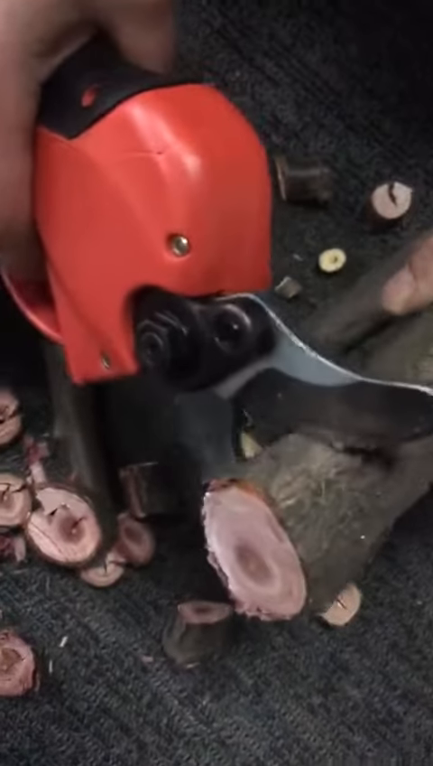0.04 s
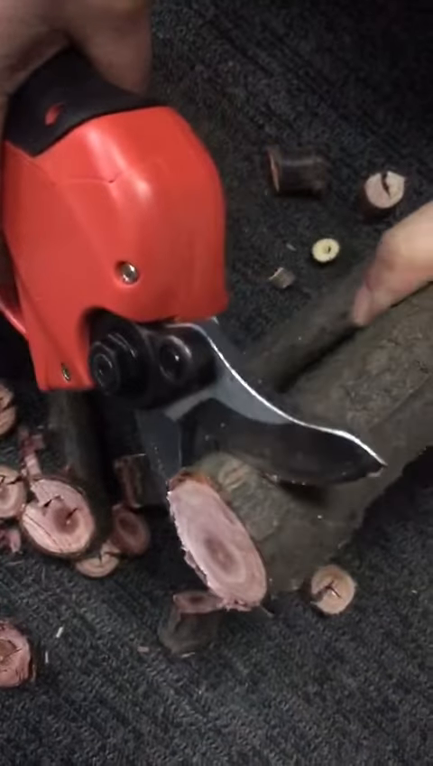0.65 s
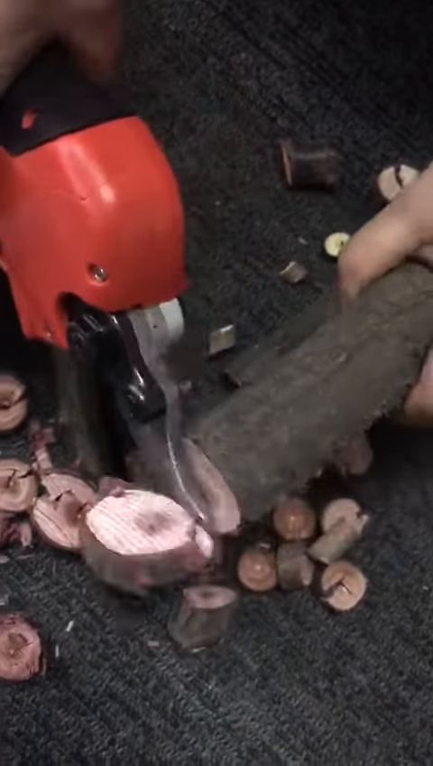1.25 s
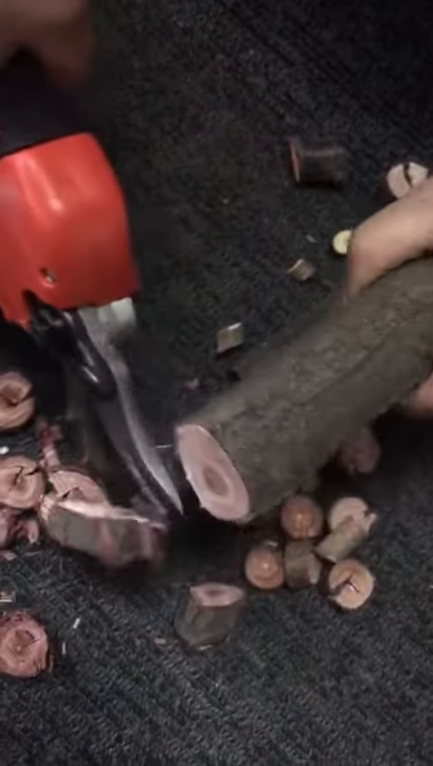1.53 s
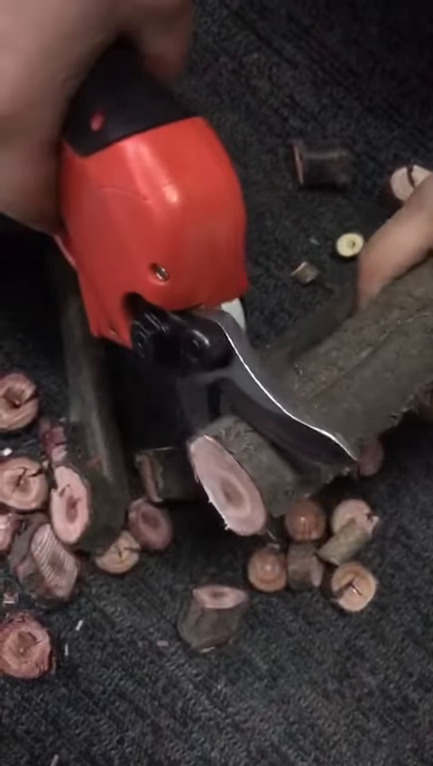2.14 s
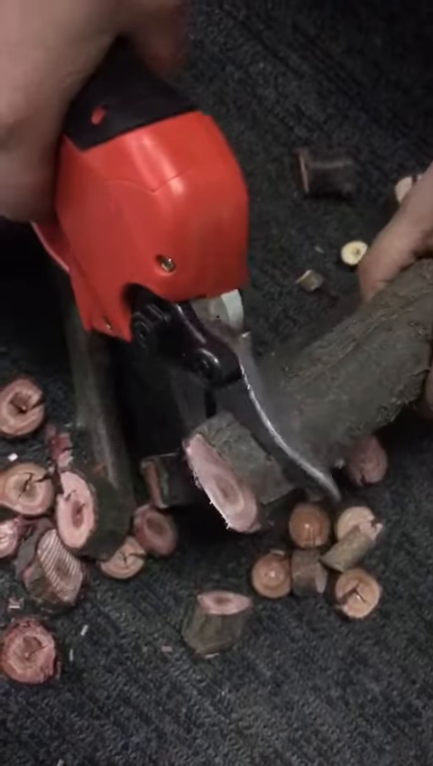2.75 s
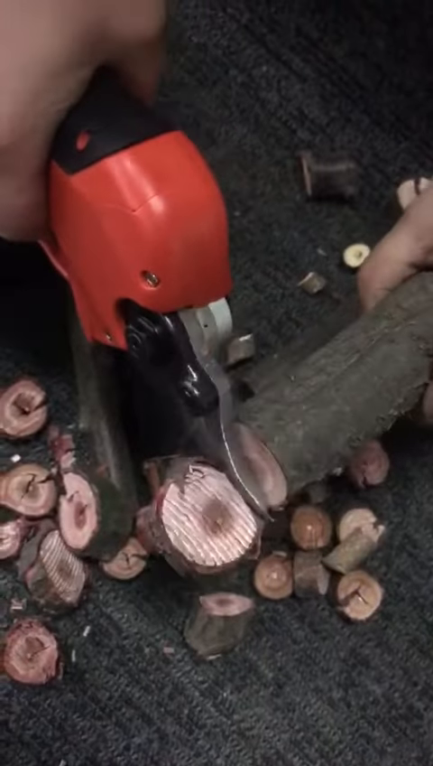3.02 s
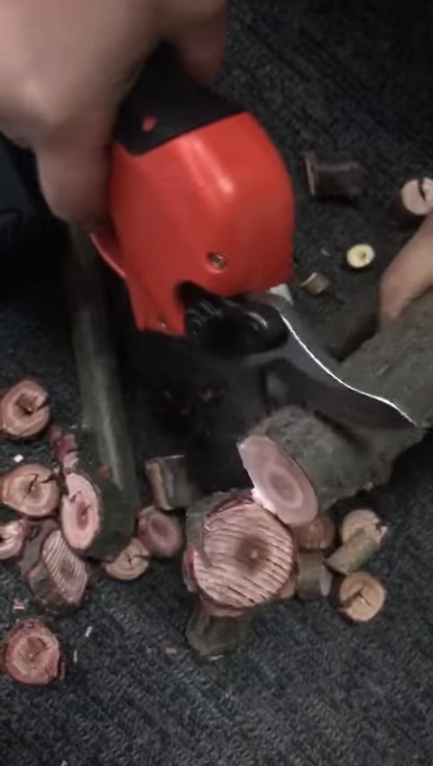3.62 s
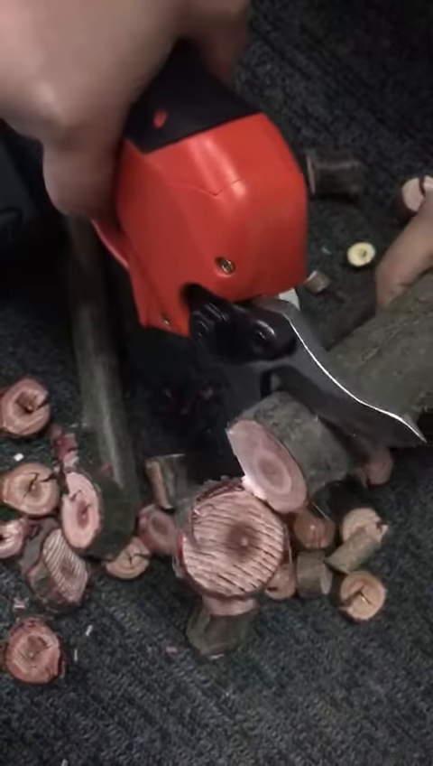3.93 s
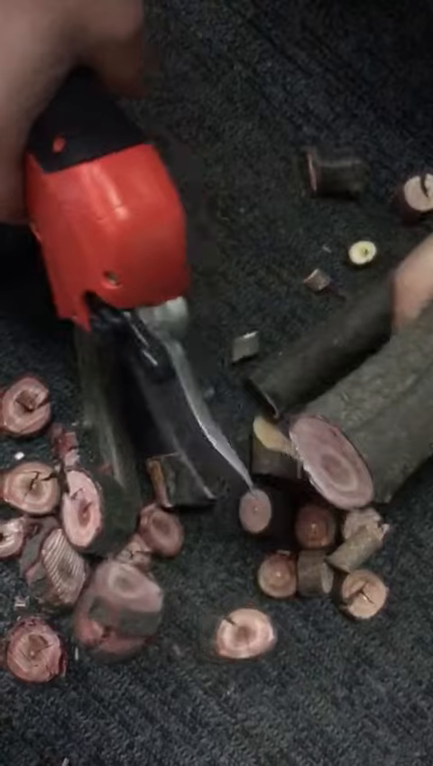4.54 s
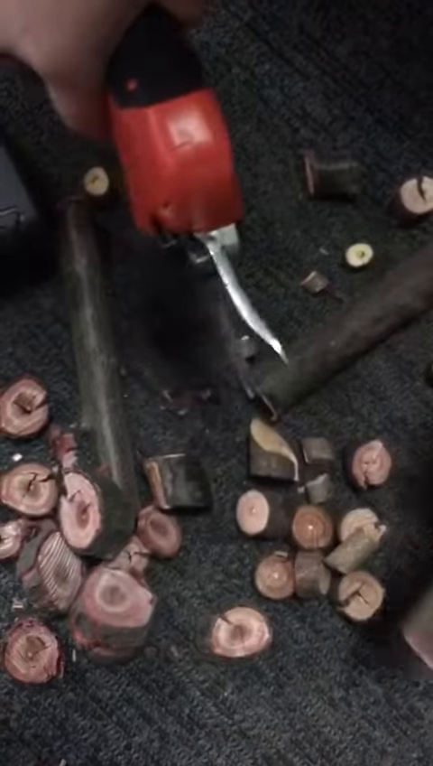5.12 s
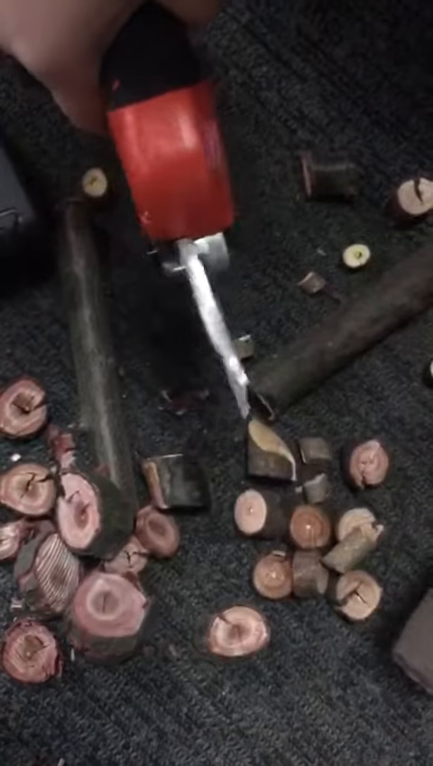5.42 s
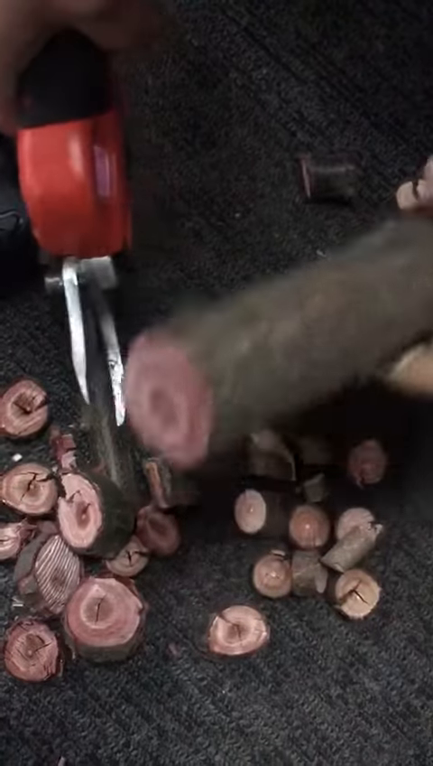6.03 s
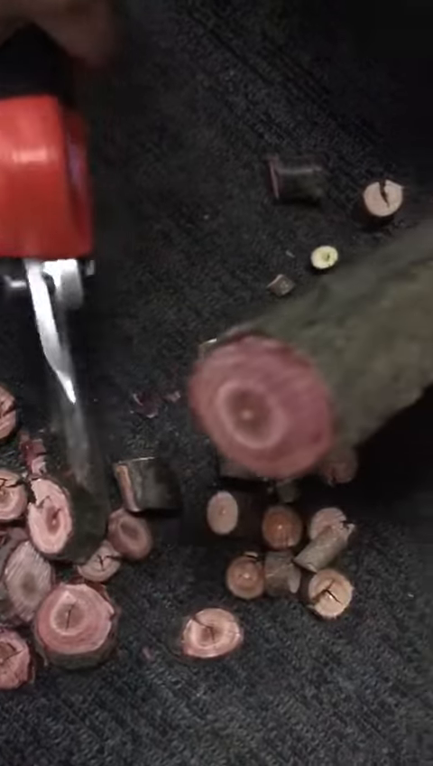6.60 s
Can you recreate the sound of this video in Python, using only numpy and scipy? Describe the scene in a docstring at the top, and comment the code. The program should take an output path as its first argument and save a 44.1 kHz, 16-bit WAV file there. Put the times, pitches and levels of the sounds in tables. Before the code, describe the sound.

Three close cuts of electric pruning shears: each a clack, a sagging motor growl and cracking wood, then a short whine as the blade reopens.

```python
"""A battery pruner slices three discs off a thick branch, close by, in a quiet room.
At each cut the gears clack, whir up and sag in pitch under load, while the wood fractures in a run of
cracks that excite the modes of the branch and jolt the tool. The motor then reverses and whines the
blade open. Handling adds ticks, rustling, a scrape of bark and a dull knock."""
import sys
import numpy as np
from scipy import signal
from scipy.fft import rfft, irfft
from scipy.io import wavfile
from scipy.ndimage import uniform_filter1d

SR = 44100
rng = np.random.default_rng(int(sys.argv[2]) if len(sys.argv) > 2 else 0)


def output_pcm(signal):
    """Save a mono or channel-first signal as 16-bit PCM at the path in sys.argv[1].

    Samples are clipped to [-1, 1] before scaling.
    """
    pcm = np.clip(np.atleast_2d(signal).T, -1, 1) * 32767
    wavfile.write(sys.argv[1], SR, np.round(pcm).astype(np.int16))


N = 298116

# Closing strokes. Each row: start in seconds, clack level in dB, blade contact and motor stop in
# seconds, loaded shaft speed in Hz, strongest jolt in dB, factor on the pitch of the cracks.
CUTS = [(.957, -38.5, 1.052, 1.232, 208, -47.5, 1.0), (2.5849, -39.5, 2.661, 2.865, 214, -49.5, 1.04),
        (3.904, -39, 3.984, 4.183, 202, -41, 1.02)]
# Opening strokes. Each row: start in seconds, clack level in dB, whine gain in dB.
OPENINGS = [(1.4286, -41, 2), (3.075, -37.5, 1.5), (4.402, -41, 1.5)]
# Fractures of the wood. Each row: time in seconds, relative level in dB.
CRACKS = [(1.098, 0.5), (1.113, 1), (1.1302, 2.5), (1.144, 1), (1.1525, -3), (1.165, -3.5), (1.1774, -2),
          (1.184, -4.5), (1.208, -4.5), (1.218, -2), (2.7035, -10.5), (2.7173, -1), (2.7403, -1),
          (2.754, 1.5), (2.773, 0), (2.805, -1), (2.8162, -6), (2.824, -2), (2.832, -0.5), (2.847, .5),
          (2.859, -2), (4.035, -7), (4.054, -1), (4.0789, -3.5), (4.0942, -5.5), (4.105, 3.5), (4.129, 0),
          (4.148, -2), (4.1634, 0.5), (4.181, 0.5), (4.192, -5)]
# Modes of the branch in the jaws. Each row: frequency in Hz, bandwidth in Hz, gain in dB.
BRANCH_MODES = [(530.7, 39, -8), (1035, 47, 0.5), (1420, 130, 1.5), (1716, 140, 4.5), (2100, 600, 1.5),
                (2250, 300, -0.5), (2980, 95, 2), (3420, 290, -11), (4320, 79, -19), (6050, 810, -17)]


def gain_of(db):
    """Decibels to amplitude."""
    return 10 ** (np.asarray(db) / 20)


def evened(x):
    """Scales to rms 1."""
    return x / np.sqrt(np.mean(x ** 2) + 1e-20)


def peaked(x, db):
    """Scales to a peak level."""
    return gain_of(db) * x / abs(x).max()


def read(points, hz):
    """Interpolation on a logarithmic frequency axis."""
    f, value = np.transpose(points)
    return np.interp(np.log(hz + 1), np.log(f + 1), value)


def add(mix, s, sound):
    """Superposition: a sound joins the mix at s seconds."""
    part = mix[max(round(s * SR), 0):][:len(sound)]
    part += sound[:len(part)]


def colour(x, points, size=4096):
    """Minimum-phase filtering by a spectrum whose rows give frequency in Hz and gain in dB."""
    log_gain = np.log(gain_of(read(points, abs(np.fft.fftfreq(size, 1 / SR)))))
    taps = np.fft.ifft(np.exp(np.conj(signal.hilbert(log_gain)))).real
    return signal.oaconvolve(x, taps)[:len(x)]


def resonate(x, hz, width):
    """A damped resonator of unit gain whose frequency may glide."""
    turn = np.exp(2j * np.pi * np.cumsum(hz * np.ones(len(x))) / SR)
    pole = np.exp(-np.pi * width / SR)
    return 2 * (turn * signal.lfilter([1 - pole], [1, -pole], x / turn + 1e-18)).real


def ring(force, modes):
    """Modal superposition: a body responds with the sum of its resonances."""
    return sum(gain_of(db) * resonate(force, hz, width) for hz, width, db in modes)


def strike(force, modes, pitch=1):
    """Modal response to an impact, with each mode's share of the energy prescribed."""
    partials = (gain_of(db) * evened(resonate(force, hz * pitch, width)) for hz, width, db in modes)
    return evened(sum(partials))


def narrow_noise(hz, width):
    """Noise through two resonators in series: a rough tone that follows hz."""
    noise = rng.standard_normal(len(hz))
    return evened(resonate(resonate(noise, hz, width), hz, width))


def wander(count, rate_hz):
    """Random fluctuation: low-pass noise of unit rms."""
    hz = np.fft.rfftfreq(count, 1 / SR)
    return evened(irfft(rfft(rng.standard_normal(count)) / (1 + (hz / rate_hz) ** 4), count))


def burst(decay_s, steep, size=4096):
    """Many tiny impacts merge into noise that starts at once and decays."""
    t = np.arange(size) / SR
    return rng.standard_normal(size) * np.exp(-(t / decay_s) ** steep)


def air(start_db=-56.5, end_db=-60, settle_s=.97):
    """Ambient noise: a low room tone that settles a little."""
    # Each row: frequency in Hz, relative density in dB.
    spectrum = [(12, -49), (20, -10), (105, -3.5), (147, -12.5), (346, -17), (510, -28), (554, -19),
                (655, -25), (840, -23), (2340, -35), (2760, -56), (3170, -44), (4800, -52.5), (13400, -56),
                (15000, -56.5)]
    early = np.exp(-(np.arange(N) / SR / settle_s) ** 2)
    level_db = end_db + (start_db - end_db) * early
    return gain_of(level_db) * evened(colour(rng.standard_normal(N), spectrum))


def rustle(resting_db=-72):
    """Friction of hands on tool and bark: the moves are incoherent, so their powers add."""
    # Each row: midpoint in seconds, half length in seconds, level in dB.
    rubs = [(0.818, 0.086, -67), (1.948, 0.048, -62), (2.2, 0.086, -67.5), (5.15, 0.21, -62),
            (5.826, 0.24, -61.5), (6.72, 0.15, -66.5)]
    # Each row: frequency in Hz, relative density in dB.
    spectrum = [(200, -2), (600, 0.5), (1000, 11.5), (2000, 0.5), (3200, -3.5), (5000, -7.5), (9000, -11.5),
                (14000, -16)]
    t = np.arange(N) / SR
    grain = gain_of(2.2 * wander(N, 90)) * rng.standard_normal(N)
    rub_power = sum(gain_of(db) ** 2 * np.exp(-((t - s) / length) ** 2) for s, length, db in rubs)
    return np.sqrt(gain_of(resting_db) ** 2 + rub_power) * evened(colour(grain, spectrum))


def clacks():
    """Backlash: at each start the gears take up their slack in two impacts that ring the gearbox."""
    # Each row: frequency in Hz, bandwidth in Hz, relative level in dB.
    gearbox_modes = [(1400, 50, -3.5), (1920, 19, -5.5), (2390, 150, -5.5), (3890, 290, -17.5),
                     (5850, 200, -13.5), (6300, 710, -13.5), (7850, 150, -8)]
    passband = [(300, -14.5), (900, -10), (1350, .5), (2600, 0), (8500, 0), (11000, -11.5)]
    out = np.zeros(N)
    for s, db, *_ in CUTS + OPENINGS:
        force = .7 * burst(.003, 3)
        add(force, .003, burst(.0013, 2))
        clack = colour(strike(force, gearbox_modes), passband)
        add(out, s, gain_of(db) * evened(clack))
    return out


def throttle(t, brake_at_s, brake_s, run_up_s=.082):
    """Share of full shaft speed: raised-cosine ramps for acceleration and braking."""
    rise, fall = np.sin(np.pi / 2 * np.clip([t / run_up_s, (t - brake_at_s) / brake_s], 0, 1)) ** 2
    return rise * (1 - fall)


def effort(speed, idle_db, knee_hz, steep):
    """Drive noise grows with shaft speed: a gain in dB that nears zero past the knee."""
    return idle_db * np.exp(-(speed / knee_hz) ** steep)


def squeal(speed, db, sag):
    """Switching noise: the chopped current squeals at low speed, lower as the shaft turns faster."""
    tone = narrow_noise(10150 - sag * speed, width=300)
    return gain_of(db) * tone * np.exp(-(speed / 210) ** 4) * (1 - np.exp(-speed / 60))


def tones(speed, orders, jitter, flutter):
    """Tones at multiples of the shaft speed; uneven teeth modulate their frequency and amplitude."""
    # Radiation from the housing. Each row: frequency in Hz, gain in dB.
    housing = [(250, -13), (600, -9), (1100, -15), (1520, 6), (1900, -1), (2500, 0), (3400, -7), (4400, 5),
               (6000, 1), (14000, 0)]
    count = len(speed)
    turns = np.cumsum(speed * (1 + jitter * wander(count, 110))) / SR
    lines = np.zeros(count)
    for order, db in orders:
        amplitude = gain_of(db) * (1 + flutter * wander(count, 230))
        lines += amplitude * np.sin(2 * np.pi * (order * turns + rng.random()))
    return colour(np.sqrt(2) * lines, housing)


def rattle(speed, spectrum, depth_db):
    """Amplitude-modulated noise: gear teeth chatter in clumps that come round with the shaft."""
    turns = np.cumsum(speed) / SR
    clumps = gain_of(depth_db * (np.cos(2 * np.pi * turns) + wander(len(speed), 260)))
    return shell(colour(clumps * rng.standard_normal(len(speed)), spectrum))


def shell(x):
    """Interference with the brief ringing of the plastic shell makes the spectrum uneven."""
    echo = burst(.0057, .97, size=1024)
    return evened(x + .71 * signal.oaconvolve(x, echo / np.linalg.norm(echo))[:len(x)])


def closing(unloaded_hz=276, sag_s=.054, coast_s=.07, coast_db_per_s=329, drive_db=3):
    """Load torque slows the growling gears; each crack briefly unloads them and lets them speed up."""
    # Gear tones. Each row: multiple of the shaft speed, relative level in dB.
    mesh_orders = [(1, -47), (6, -52), (7, -39.5), (10.5, -25), (12, -28.5), (21, -31), (31.5, -38.5),
                   (42, -46), (52.5, -50)]
    # Each row: frequency in Hz, relative density in dB.
    rattle_spectrum = [(100, -24), (400, -22), (800, -21.5), (1400, -2), (2000, -2), (2800, -3),
                       (3700, -6.5), (4550, -6.5), (5000, -12), (6700, -1), (8200, -14), (10000, -11),
                       (11500, -17.5), (14000, -22)]
    out = np.zeros(N)
    for start, _, contact, stop, loaded_hz, *_ in CUTS:
        t = np.arange(start, stop + coast_s, 1 / SR)
        slip, bite = slipping(t), biting(t)
        free = np.exp(-(np.maximum(t - contact, 0) / sag_s) ** 1.3)
        speed = loaded_hz + (unloaded_hz - loaded_hz) * free
        speed *= throttle(t - start, stop - start, coast_s)
        speed *= 1 + .04 * (slip - uniform_filter1d(slip, size=2000))
        load_db = drive_db + effort(speed, idle_db=-21.5, knee_hz=144, steep=1.45) - .21 * slip
        load_db -= coast_db_per_s * np.maximum(t - stop, 0)
        mesh = tones(speed, mesh_orders, jitter=.013, flutter=.5)
        # The mesh tone fades as the wood damps the jaws and the motor coasts out.
        coasting = np.exp(-(t[-1] - t) / .044)
        mesh *= gain_of(-4.5 * bite - 5.7 * coasting)
        teeth = gain_of(-25 - 4.7 * free) * rattle(speed, rattle_spectrum, depth_db=3)
        cutting = gain_of(load_db) * (mesh + teeth + crunch(bite))
        run_up = np.exp(-(t - start) / .09)
        add(out, start, cutting + run_up * squeal(speed, db=-36.5, sag=5))
    return out


def slipping(t, rise_s=.005):
    """Stress release: a pulse after each crack, rising as the blade slips and falling as it grips."""
    age = np.maximum(t[:, None] - np.array(CRACKS)[:, 0], 0) / rise_s
    return (age * np.exp(1 - age)).sum(1)


def biting(t, lag_s=.01, width_s=.011):
    """Compression of the wood by the blade, from 0 to 1, greatest just after each crack."""
    nearest = abs(t[:, None] - np.array(CRACKS)[:, 0] - lag_s).min(1)
    return np.exp(-(nearest / width_s) ** 2)


def crunch(bite, fibres_per_s=1500):
    """Shot noise: crushed fibres excite the modes of the branch with random impulses."""
    fibres = rng.standard_normal(len(bite)) * (rng.random(len(bite)) < fibres_per_s / SR)
    return gain_of(-28) * bite * evened(ring(fibres, BRANCH_MODES))


def cracks(snap_db=-7.5, scatter_db=2, splinters_per_s=350):
    """Brittle fracture: a fibre snaps and the split runs on, ringing the branch and jolting the tool."""
    # Each row: frequency in Hz, relative density in dB.
    snap_spectrum = [(300, -20), (750, -19.5), (1500, -5.5), (3200, -1.5), (5000, -10.5), (7000, -2),
                     (10000, 2.5), (13000, -3.5), (15000, 0)]
    # The tool lurches as a disc breaks free. Each row: time in seconds, level in dB.
    lurches = [(2.848, -40), (4.183, -49.5), (4.191, -36.5)]
    jolt_lag_s, jolt_width_s, jolt_range_db = .078, .04, 11.5
    out = np.zeros(N)
    t = np.arange(4096) / SR
    for s, db in CRACKS:
        _, _, contact, *_, jolt_db, pitch = min(CUTS, key=lambda cut: abs(cut[0] - s))
        split = burst(.0052, 2.1) * (1 - .37 * np.exp(-t / .0017))
        add(out, s, gain_of(db - 25) * strike(split, BRANCH_MODES, pitch))
        severity = np.exp(-((s - contact - jolt_lag_s) / jolt_width_s) ** 2)
        add(out, s, thump(jolt_db - jolt_range_db * (1 - severity)))
        snap = colour(burst(.00048, 1), snap_spectrum)
        add(out, s, peaked(snap, snap_db + scatter_db * rng.standard_normal()))
        splinters = (rng.random(len(t)) < splinters_per_s / SR) * rng.standard_normal(len(t))
        add(out, s, gain_of(db - 14.5) * colour(splinters * np.exp(-t / .012), snap_spectrum))
    for s, db in lurches:
        add(out, s, thump(db))
    return out


def thump(db):
    """Recoil: the tool jolts in the hand with a low-frequency pulse."""
    # Each row: frequency in Hz, relative density in dB.
    spectrum = [(25, -20.5), (60, 0), (170, -0.5), (350, -11), (750, -32.5), (2000, -51)]
    return gain_of(db) * evened(colour(burst(.0051, 1.8), spectrum))


def opening(free_hz=280.3, brake_at_s=.199, brake_s=.132):
    """Pitch follows shaft speed: the unloaded motor runs up, holds a clean whine and brakes."""
    # Each row: multiple of the shaft speed, relative level in dB.
    whine_orders = [(1, -43), (6, -52), (10.5, -41), (12, -33.5), (21.7, -33.5), (22.467, -40), (28, -66.5)]
    # Each row: frequency in Hz, relative density in dB.
    rattle_spectrum = [(100, -48), (400, -19), (1100, -11.5), (1400, -3.5), (1660, 10), (2050, -7),
                       (2700, 0.5), (3600, -4.5), (4200, 3), (5000, -10), (6700, 7), (7700, -5.5),
                       (9900, -3.5), (10800, -18.5), (14000, -27)]
    out = np.zeros(N)
    t = np.arange(0, brake_at_s + brake_s, 1 / SR)
    speed = free_hz * throttle(t, brake_at_s, brake_s)
    load = gain_of(effort(speed, idle_db=-23.5, knee_hz=52.6, steep=1.2))
    full_speed = (speed / free_hz) ** 10
    braking = t > brake_at_s
    for s, _, whine_db in OPENINGS:
        whine = full_speed * tones(speed, whine_orders, jitter=.0005, flutter=.15)
        magnetic = stator(speed, current=1 - full_speed)
        teeth = gain_of(-35.5 + 2.2 * full_speed) * rattle(speed, rattle_spectrum, depth_db=1)
        switching = np.where(braking, squeal(speed, db=-40, sag=4.4), squeal(speed, db=-38.5, sag=5.8))
        motor = gain_of(whine_db) * (whine + bearings(speed)) + magnetic + teeth
        add(out, s, load * motor + switching)
    return out


def stator(speed, current):
    """Magnetic forces under torque give tones that flare as they sweep through the can's resonances."""
    # Each row: multiple of the shaft speed, relative level in dB.
    orders = [(12, -35.5), (24, -49.5)]
    # Each row: frequency in Hz, bandwidth in Hz, gain in dB.
    can_modes = [(1597, 220, 7), (2611, 220, 6.5)]
    force = current * tones(speed, orders, jitter=.0036, flutter=.33)
    return force + ring(force, can_modes)


def bearings(speed):
    """Narrow-band noise from the bearings: a fuzzy whistle that swells only near full speed."""
    return gain_of(-32) * (speed / speed.max()) ** 9 * narrow_noise(22.43 * speed, width=680)


def ticks():
    """Brief contacts of blade and bark give broadband clicks, each with a sharp edge and a body."""
    # Each row: time in seconds, edge level in dB, body level in dB.
    contacts = [(1.925, -73, -70), (1.985, -66, -67), (2.1903, -54, -62), (2.193, -54.5, -63),
                (5.0211, -39, -67.5), (5.0239, -54.5, -76), (5.777, -60, -63.5), (5.954, -70, -74)]
    # Each row of both spectra: frequency in Hz, relative density in dB.
    edge = [(500, -18.5), (3500, -26.5), (6500, -16), (9500, -10), (11000, -7), (13000, -3.5),
            (15000, -7.5)]
    body = [(200, -8.5), (1000, -6.5), (2400, -4), (3200, 1.5), (4200, -6.5), (6400, 0), (9000, -10.5),
            (14000, -16.5)]
    out = np.zeros(N)
    for s, edge_db, body_db in contacts:
        add(out, s, gain_of(edge_db) * evened(colour(burst(.0012, 1.7), edge)))
        add(out, s, gain_of(body_db) * evened(colour(burst(.00064, .71), body)))
    return out


def scrape(peak_s=5.81, peak_db=-57.5, fade_db_per_s=68.5):
    """Stick-slip friction: rough bark catches on the blade in many tiny slips."""
    # Each row: frequency in Hz, bandwidth in Hz, gain in dB.
    modes = [(1880, 89, 5), (2270, 254, 1), (3200, 500, -4)]
    slips = gain_of(2.8 * wander(N, 35)) * rng.standard_normal(N)
    level_db = peak_db - fade_db_per_s * abs(np.arange(N) / SR - peak_s)
    return gain_of(level_db) * evened(ring(slips, modes))


def knock(at_s=6.719, peak_db=-41):
    """A damped impact: the branch knocks dully on a loose piece."""
    # Each row: frequency in Hz, relative density in dB.
    spectrum = [(100, -15), (550, 3.5), (900, 3), (1500, -5), (3000, -25), (10000, -45.5)]
    out = np.zeros(N)
    add(out, at_s, peaked(colour(burst(.0053, .54), spectrum), peak_db))
    return out


def room(x, build_s=.0065):
    """Diffuse reverberation: each frequency band decays exponentially at its own rate."""
    # Each row: frequency in Hz, time to fall 60 dB in seconds.
    decay_times = [(100, 0.12), (500, 1), (1700, .65), (4000, 0.67), (7000, 0.52), (14000, 0.95)]
    # Each row: frequency in Hz, gain in dB.
    response = [(100, -6), (1000, -0.5), (2200, 6), (3300, 0), (4500, 2.5), (5100, -2), (6500, -4),
                (14000, -13)]
    hz, t, bands = signal.stft(rng.standard_normal(SR), SR, nperseg=256)
    decay = gain_of(-60 * t / read(decay_times, hz)[:, None])
    tail = signal.istft(bands * decay, SR, nperseg=256)[1]
    tail *= 1 - np.exp(-np.arange(len(tail)) / SR / build_s)
    return signal.fftconvolve(colour(x, response), tail / np.linalg.norm(tail))[:N]


def scene():
    """Close to tool and wood, the direct sound dominates the reverberant field."""
    near = closing() + opening() + clacks() + cracks() + rustle() + ticks() + knock() + scrape()
    return (near + gain_of(-19) * room(near) + air())[None]


def record(dry):
    """The microphone drops the deepest bass, saturates softly on peaks and limits the bandwidth."""
    bass_hz, ceiling_db, edge_hz = 38, -3.5, 14250
    thinned = signal.sosfilt(signal.butter(3, bass_hz, "highpass", fs=SR, output="sos"), dry)
    rounded = thinned / (1 + (thinned / gain_of(ceiling_db)) ** 4) ** (1 / 4)
    lowpass = signal.firwin(255, edge_hz, window=("kaiser", 8), fs=SR)
    return signal.oaconvolve(rounded, lowpass[None], "same")


dry = scene()
out = record(dry)
output_pcm(out)
```